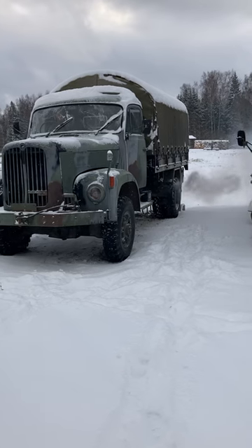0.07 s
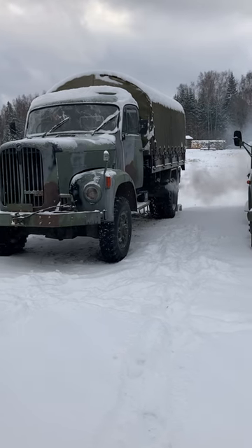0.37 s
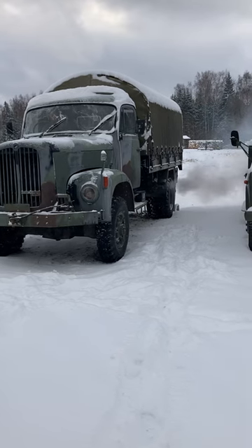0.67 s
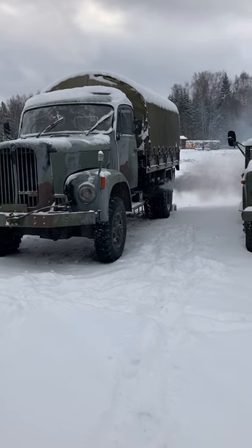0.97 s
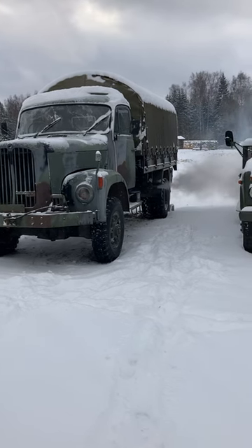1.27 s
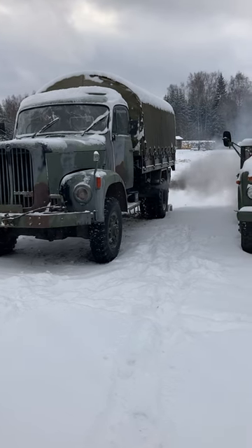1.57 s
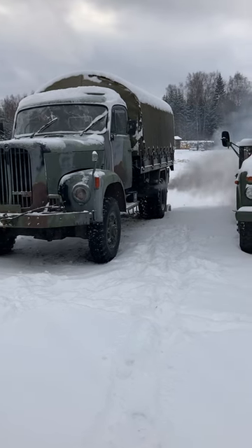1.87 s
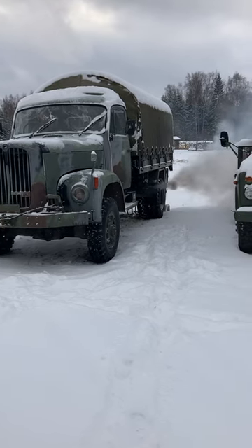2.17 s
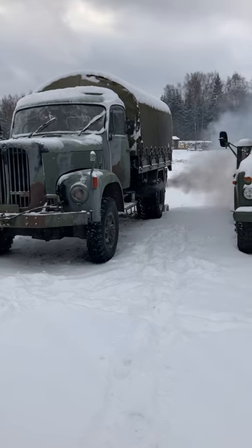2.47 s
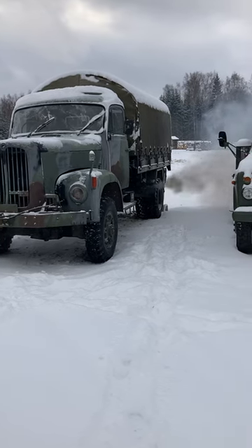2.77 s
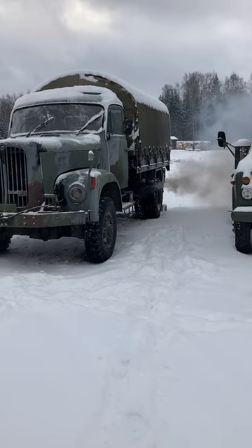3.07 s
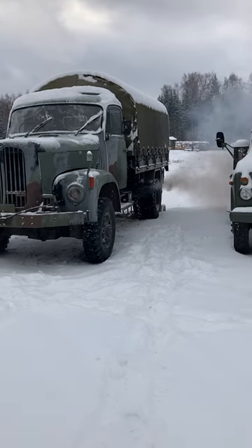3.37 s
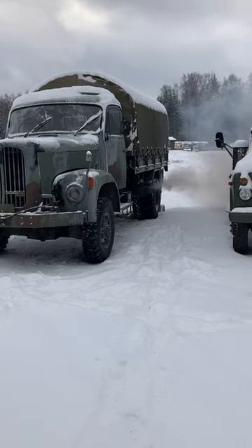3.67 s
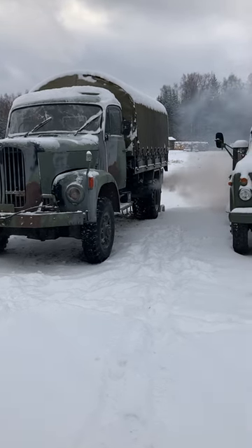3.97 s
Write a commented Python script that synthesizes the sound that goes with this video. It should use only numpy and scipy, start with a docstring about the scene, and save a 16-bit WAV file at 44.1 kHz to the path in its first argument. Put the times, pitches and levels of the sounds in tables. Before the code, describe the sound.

A diesel truck starts from cold, a few metres away outdoors. The starter whines and wavers until about 0.8 seconds, with soft puffs of air. The engine first fires near 0.4 seconds and stumbles with uneven bangs and knocks, growing faster and stronger. From about 2.5 seconds it holds a deep, loping idle with hollow chugs, ticking valves and a few faint metal pings until the end at 4 seconds.

```python
"""A wavering whine, a few stumbling bangs, then a loping idle: a diesel truck starts from cold.
It stands in an open, snowy field. The starter's gear whines until the six cylinders catch by fits.
Each firing thumps the air in the exhaust and shakes the engine block, which rings and knocks.
Hollow chugs come from the pipe and body, the valves tick, air puffs out and a loose part pings."""
import sys
import numpy as np
from scipy import signal
from scipy.fft import rfft, irfft, next_fast_len
from scipy.io import wavfile
from scipy.ndimage import uniform_filter1d

SR = 44100
rng = np.random.default_rng(int(sys.argv[2]) if len(sys.argv) > 2 else 0)


def transcribe(signal):
    """Save signal, clipped to [-1, 1], as a 16-bit WAV file at the path in sys.argv[1]."""
    frames = np.atleast_2d(signal).T
    limited = np.clip(frames, -1, 1)
    pcm = np.round(limited * 32767).astype(np.int16)
    wavfile.write(sys.argv[1], SR, pcm)


N = 176400
T = np.arange(N) / SR

# Levels in all tables are relative. How fully the cylinders fire: t/s, level/dB
BURN_STRENGTH = [(0, -15), (.33, -50), (.39, -2), (.48, -14), (.6, -11), (.76, -30), (.82, -12),
                 (1.0, -7.5), (1.35, -7.5), (1.48, -14), (1.55, -10), (1.7, -4.5), (1.95, -7), (2.1, -2.5),
                 (2.45, -1), (4, -0.5)]
# One row per cylinder, in firing order: thump/dB, knock/dB, valve tick/dB
CYLINDER_LEVELS = [(-1, 3.5, 13), (-13, 2, 0), (-4.5, -4, 8.5), (-0.5, 4, 11.5), (-8.5, 2.5, 7),
                   (-1.5, -0.5, 5.5)]
# The deep ring of the engine block: f/Hz, level/dB
BLOCK_SPECTRUM = [(100, -29), (250, -6.5), (320, -11), (400, -3.5), (450, -6), (520, -4.5), (590, -1),
                  (640, -6), (695, 0), (750, -5), (860, -0.5), (930, -5.5), (1020, -8.5), (1130, -6),
                  (1200, 0), (1300, -8), (1420, -18.5), (1800, -41)]
# The sharper ring of the knock: f/Hz, level/dB
KNOCK_SPECTRUM = [(900, -35), (1400, -9), (1545, -2), (1630, -8), (1710, 2), (1880, -2.5), (2050, -8.5),
                  (2170, -4.5), (2280, -4), (2450, -5.5), (2700, -10), (2850, -7), (3150, -8),
                  (3700, -12.5), (4500, -20), (7000, -52)]


def amp(db):
    """Turns decibels into a gain."""
    return 10 ** (np.asarray(db) / 20)


def unit(x):
    """Scales a signal to an average (rms) size of 1."""
    return x / np.sqrt(np.mean(x ** 2) + 1e-20)


def curve(rows, column=1):
    """Joins a table's points in time with straight lines."""
    rows = np.array(rows)
    return np.interp(T, rows[:, 0], rows[:, column])


def value_at(points, hz):
    """Looks up a table along a log-frequency axis."""
    f, value = np.transpose(points)
    return np.interp(np.log(hz + 1), np.log(f + 1), value)


def colour(x, spectrum):
    """Gives a sound this spectrum; the ringing comes only after each hit."""
    size = 2 ** 15
    log_gain = np.log(amp(value_at(spectrum, abs(np.fft.fftfreq(size, 1 / SR)))))
    ring = np.fft.ifft(np.exp(np.conj(signal.hilbert(log_gain)))).real[:size // 4]
    return signal.fftconvolve(x, ring)[:N]


def impulses(rows):
    """One spike for each row of t/s, level/dB."""
    hits = np.zeros(N)
    for time_s, db in rows:
        hits[int(max(time_s, 0) * SR)] = amp(db)
    return hits


def bursts(hits, rise_s, decay_s):
    """A quick swell and fade after each spike."""
    t = T[:SR // 4]
    return signal.fftconvolve(hits, (1 - np.exp(-t / rise_s)) * np.exp(-t / decay_s))[:N]


def swings(hits, hz, swell_s, fade_s):
    """A few quickly dying swings around each spike."""
    t = np.arange(-(SR // 10), SR // 10 + 1) / SR
    shape = np.exp(-.5 * (t / np.where(t < 0, swell_s, fade_s)) ** 2)
    return signal.fftconvolve(hits, -shape * np.cos(2 * np.pi * hz * t), "same")


def crank():
    """How far the engine has turned, counted in firings; the first falls at 0."""
    # Engine speed: t/s, firing rate/Hz
    speed = [(0.0, 12.5), (0.25, 9.43), (0.47, 17.3), (0.82, 16.3), (1.0, 27.4), (1.3, 27.3), (1.55, 25),
             (1.95, 28.5), (2.25, 33.54), (2.52, 38.87), (2.85, 38.4), (3.3, 39.9), (4.0, 40.3)]
    return np.cumsum(curve(speed)) / SR - 0.6


def crank_hits(positions, db, scatter_db, delay_s=0, jitter_s=0.00034):
    """Spikes at the given crank positions, each a little off in time and strength."""
    late, size = rng.standard_normal((256, 2))[:len(positions)].T
    times = np.interp(positions, crank(), T, right=2 * T[-1]) + delay_s + jitter_s * late
    hits = np.zeros(N + 1)
    hits[np.clip(times * SR, 0, N).astype(int)] = amp(db + scatter_db * size)
    return hits[:N]


def firings(column, scatter_db, delay_s):
    """One spike per firing, sized by a column of the cylinder table."""
    count = np.arange(int(crank()[-1]) + 1)
    db = np.array(CYLINDER_LEVELS)[count % len(CYLINDER_LEVELS), column]
    return crank_hits(count, db, scatter_db, delay_s)


def clatter(hits, rise_s, decay_s, steady, repeat, grain_db):
    """Tiny impacts that flare with each hit; the share `repeat` comes back every engine cycle."""
    cycle = np.floor(crank() / len(CYLINDER_LEVELS))
    samples_into_cycle = np.arange(N) - np.searchsorted(cycle, cycle)
    noise = rng.standard_normal((2, N))
    grain_size = np.repeat(rng.standard_normal((2, N // 30 + 1)), 30, axis=1)[:, :N]
    recurring, fresh = noise * amp(grain_db * grain_size)
    impacts = np.sqrt(repeat) * recurring[samples_into_cycle] + np.sqrt(1 - repeat) * fresh
    return (unit(bursts(hits, rise_s, decay_s)) + steady) * unit(impacts)


def air_puffs():
    """Air escapes in short, soft hisses while the engine cranks and stumbles."""
    # Each puff: t/s, level/dB
    puffs = [(.04, -45), (.148, -44), (.255, -41), (.372, -41.5), (.452, -38), (.795, -40.5), (1.45, -48),
             (1.537, -40.5), (1.693, -45), (2.538, -40)]
    # Tone of the hiss: f/Hz, level/dB
    spectrum = [(3000, -10), (6300, -3), (7500, 3), (8700, -6), (10000, -4), (15000, -22)]
    hiss = unit(colour(rng.standard_normal(N), spectrum))
    return amp(7) * hiss * bursts(impulses(puffs), rise_s=0.0046, decay_s=0.011)


def click(at_s=2.383):
    """One bright click as the engine speeds up."""
    bright = unit(np.diff(rng.standard_normal(N + 1)))
    return bright * bursts(impulses([(at_s, -30)]), rise_s=0.0005, decay_s=0.004)


def metal_pings(ring_hz=2800):
    """A loose metal part rings briefly on one note."""
    # Each ping: t/s, level/dB
    pings = [(1.33, -34), (2.513, -28.5), (2.68, -33.5), (3.435, -32), (3.74, -33), (3.88, -30.5)]
    return bursts(impulses(pings), rise_s=0.00052, decay_s=0.013) * np.sin(2 * np.pi * ring_hz * T)


def valve_gear():
    """The valves tick and hiss in step with the cylinders."""
    # Loudness of the treble: t/s, level/dB
    loudness = [(0, -60), (.22, -56), (.32, -56), (.4, -49), (.55, -52), (.6, -46), (.65, -68), (.7, -51),
                (.85, -49.5), (2.0, -47.5), (2.55, -42), (2.68, -45), (4, -45)]
    # Tone of the bright ticking hiss: f/Hz, level/dB
    spectrum = [(2000, -23), (3300, -1), (4500, 6.5), (5400, -18), (6300, 5.5), (7400, 1.5), (8300, 4),
                (9500, 1), (11000, -1), (12500, -18), (14000, 1), (16000, -19)]
    hits = firings(column=2, scatter_db=1.5, delay_s=0.014)
    ticks = clatter(hits, rise_s=0.006, decay_s=0.009, steady=2.4, repeat=0.073, grain_db=2.0)
    return amp(3 + curve(loudness)) * unit(colour(ticks, spectrum))


def starter_whine(waver=0.035, teeth=9, wobble=0.61):
    """The starter's gear teeth whine roughly, throbbing once per turn, until the engine catches."""
    # Pitch and loudness of the whine: t/s, f/Hz, level/dB
    whine = [(0, 599, -29.5), (.025, 583, -40), (.06, 702.6, -43), (.105, 871.5, -48), (.125, 868, -33.5),
             (.2, 865, -40), (.25, 727, -37.5), (.3, 593.5, -36.5), (.4, 600, -54), (.475, 625, -37),
             (.51, 582, -38), (.56, 600, -62), (.6, 660, -37), (.65, 624.6, -43), (.72, 561, -40.5),
             (.8, 549, -73)]
    noises = rng.standard_normal((3, N))
    drift, rough_sin, rough_cos = (unit(uniform_filter1d(noise, size=220)) for noise in noises)
    phase = 2 * np.pi * np.cumsum(curve(whine) * (1 + waver * drift)) / SR
    rasp = (rough_sin * np.sin(phase) + rough_cos * np.cos(phase)) / np.sqrt(2)
    throb = 1 + wobble * np.cos(phase / teeth)
    return amp(curve(whine, column=2)) * (np.sin(phase) + rasp) * throb


def hard_ignitions():
    """Unburnt fuel lights with single bangs; the block and its covers ring on."""
    # Each bang: t/s, level/dB
    bangs = [(.003, -32.5), (.368, -30), (.456, -37), (.586, -27.5), (.708, -30.5), (.78, -32), (.881, -30),
             (.93, -25.5), (1.043, -29), (1.117, -26.5), (1.203, -33.5), (1.262, -29), (1.465, -30.5),
             (1.5, -34), (1.58, -32.5), (1.694, -29), (1.831, -28), (2.063, -31), (2.185, -30),
             (2.299, -25.5), (2.462, -25.5), (2.514, -25.5), (2.543, -27)]
    blows = rng.standard_normal(N) * bursts(impulses(bangs), rise_s=0.0023, decay_s=0.016)
    body = amp(-2) * unit(colour(blows, BLOCK_SPECTRUM))
    knock = amp(-2.5) * unit(colour(blows, KNOCK_SPECTRUM))
    return np.std(blows) * (body + knock)


def engine_block():
    """Burning fuel shakes the block and its covers, making them ring."""
    # How hard the firings strike: t/s, level/dB
    force = [(0, -47), (.55, -23), (.9, 2), (2.5, 2), (2.9, -4.5), (4, -8)]
    # Loudness of the two rings: t/s, block level/dB, knock level/dB
    loudness = [(0, -32.5, -41), (.25, -33.5, -41.5), (.37, -32, -37.5), (.43, -34.5, -40), (.48, -31, -35),
                (.565, -39, -43.5), (.6, -30, -41), (.76, -34.5, -38.5), (.93, -34, -39.5),
                (1.4, -33.5, -40), (1.95, -33, -37.5), (2.53, -32.5, -36.5), (2.68, -33.5, -40.5),
                (2.9, -34, -39.5), (3.4, -31.5, -38.5), (4, -34, -38.5)]
    hits = firings(column=1, scatter_db=2.5, delay_s=0.0026) * amp(curve(force))
    body = clatter(hits, rise_s=0.0052, decay_s=0.016, steady=3.0, repeat=0.55, grain_db=2.0)
    knock = clatter(hits, rise_s=0.0073, decay_s=0.013, steady=2.06, repeat=0.39, grain_db=2.5)
    return (amp(curve(loudness, column=1)) * unit(colour(body, BLOCK_SPECTRUM))
            + amp(1 + curve(loudness, column=2)) * unit(colour(knock, KNOCK_SPECTRUM)))


def chugs(growth=1.17, rough=0.42):
    """Hollow knocks in the pipe and body make the idle lope; they grow as the cylinders fire."""
    # The knocks of one engine cycle: place/firings, f/Hz, level/dB, fade/s
    knocks = [(1.9, 590, -33, .013), (2.45, 252, -29, 0.0077), (2.55, 147, -27.5, 0.017),
              (5.15, 250, -29, 0.016), (5.25, 155, -29, 0.013)]
    sound = np.zeros(N)
    for place, hz, db, fade_s in knocks:
        hits = crank_hits(np.arange(place, crank()[-1], len(CYLINDER_LEVELS)), db, scatter_db=0.4)
        flutter = unit(uniform_filter1d(rng.standard_normal(N), size=300))
        sound += swings(hits, hz, swell_s=0.0063, fade_s=fade_s) * (1 + rough * flutter)
    return sound * amp(curve(BURN_STRENGTH)) ** growth


def exhaust(rumble_growth=0.31):
    """Each firing swings the air in the silencer; the flowing gas rumbles underneath."""
    # Tone of the flowing gas: f/Hz, level/dB
    spectrum = [(15, -38), (32, 5.5), (60, 2.5), (90, 4), (125, 2), (200, -5.5), (400, -36.5)]
    burn = amp(curve(BURN_STRENGTH))
    pulses = burn * firings(column=0, scatter_db=1.3, delay_s=0.01256)
    thump = amp(-13.5) * swings(pulses, hz=64.1, swell_s=0.0061, fade_s=0.013)
    overtone = amp(-33) * swings(pulses, hz=123, swell_s=0.002, fade_s=0.012)
    rumble = amp(-36.5) * burn ** rumble_growth * unit(colour(rng.standard_normal(N), spectrum))
    low_cut = signal.butter(1, 12, "high", fs=SR, output="sos")
    return signal.sosfilt(low_cut, thump + overtone) + rumble


def stereo(x):
    """The sound reaches left and right slightly out of step, with a little of it scattered."""
    # How far the left side leads: f/Hz, phase/rad
    left_lead = [(300, 0), (800, .1), (2550, -.15), (2850, -1.6), (3200, -3.4), (3700, -4.1), (4500, -3.8),
                 (5100, -3.2), (5900, -3.05), (6400, -2.5), (7400, -1.1), (8300, 0), (9500, .5), (10500, 2),
                 (11300, 3.05), (12200, 3.25), (13000, 4), (14000, 5.9)]
    # Left level minus right level: f/Hz, level/dB
    balance = [(40, -2), (250, -1.6), (1000, .2)]
    # How alike the sides are: f/Hz, likeness (0 to 1)
    likeness = [(100, .9995), (300, .98), (600, .94), (1300, .97), (2500, .88), (8000, .9)]
    size = next_fast_len(N + SR // 2)
    hz, direct = np.fft.rfftfreq(size, 1 / SR), rfft(x, size)
    echoes = rng.standard_normal(SR // 10) * np.linspace(1, 0, SR // 10)
    scattered = direct * rfft(echoes / np.linalg.norm(echoes), size)
    alike = value_at(likeness, hz)
    mid, side = direct * np.sqrt((1 + alike) / 2), scattered * np.sqrt((1 - alike) / 2)
    lean = amp(value_at(balance, hz) / 2)
    lag = np.exp(-1j * value_at(left_lead, hz))
    left, right = (mid + side) * lean, (mid - side) / lean * lag
    return irfft(np.array([left, right]), size)[:, :N]


def scene():
    """The whole truck, heard from a few metres in front."""
    engine = exhaust() + chugs() + engine_block() + hard_ignitions() + valve_gear()
    return stereo(engine + air_puffs() + click() + metal_pings() + starter_whine())


def record(dry):
    """Cuts the highest treble, above 15900 Hz."""
    low_pass = signal.firwin(511, 15900, window=("kaiser", 9), fs=SR)
    return signal.oaconvolve(dry, low_pass[None], "same")


dry = scene()
out = record(dry)
transcribe(out)
```